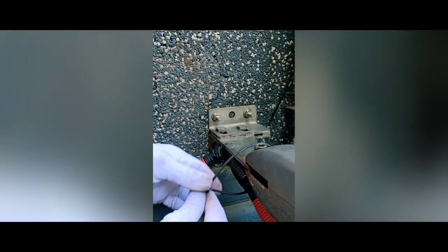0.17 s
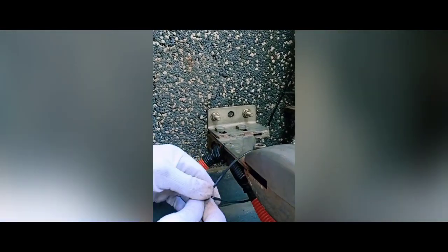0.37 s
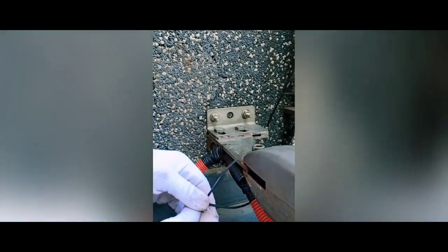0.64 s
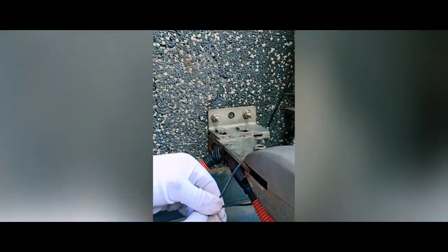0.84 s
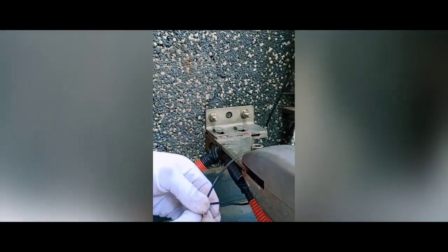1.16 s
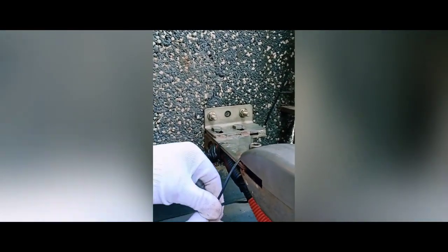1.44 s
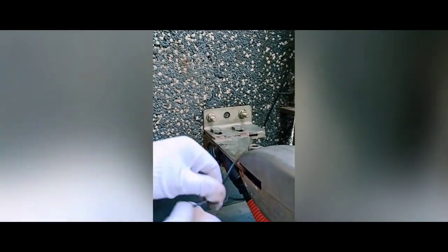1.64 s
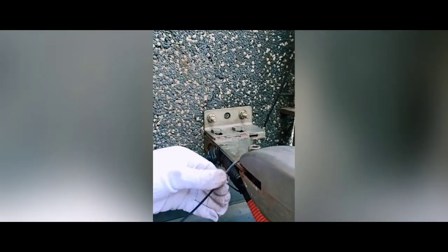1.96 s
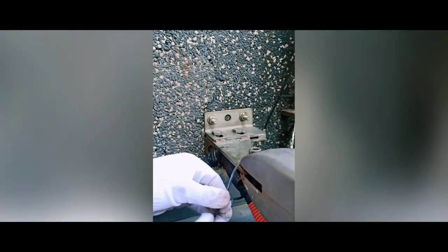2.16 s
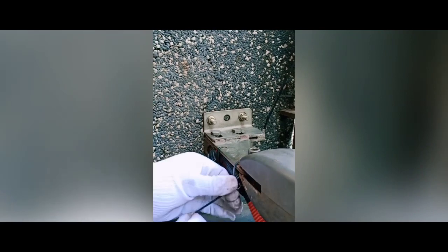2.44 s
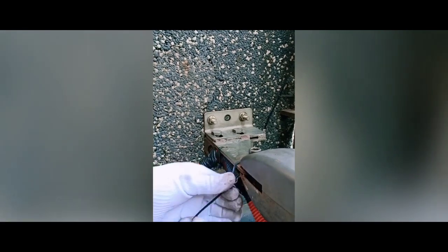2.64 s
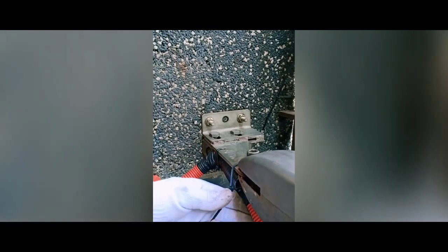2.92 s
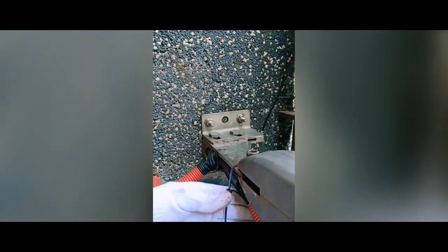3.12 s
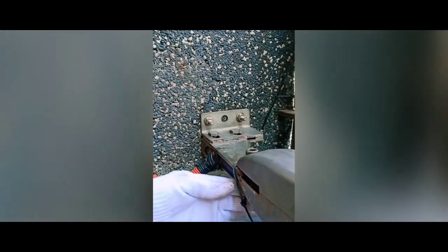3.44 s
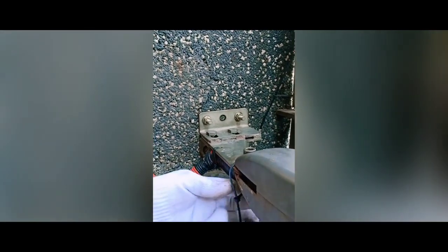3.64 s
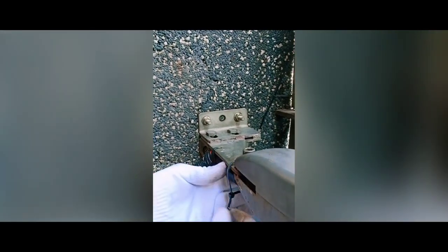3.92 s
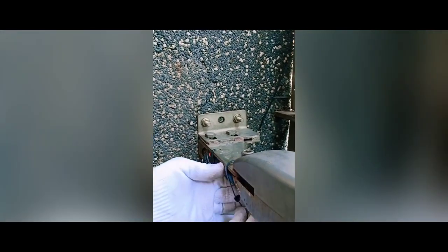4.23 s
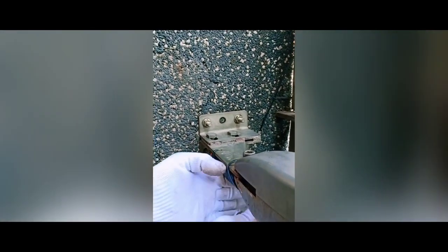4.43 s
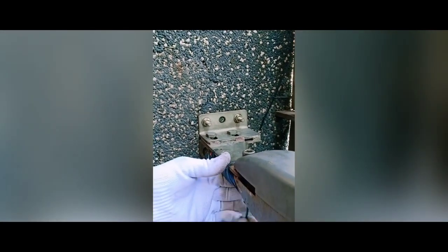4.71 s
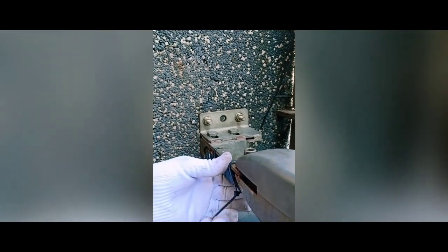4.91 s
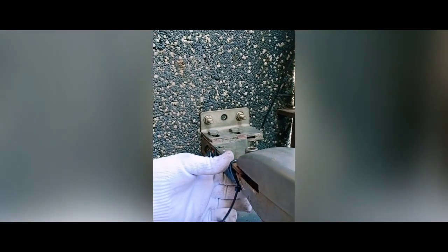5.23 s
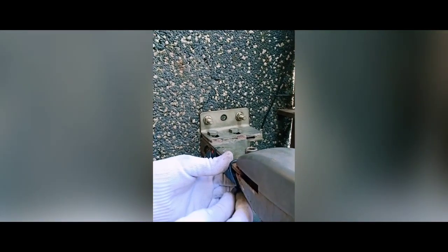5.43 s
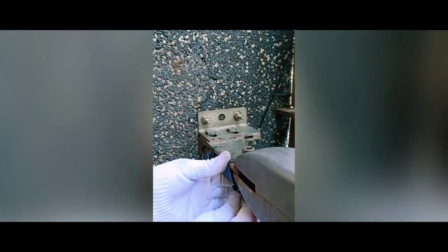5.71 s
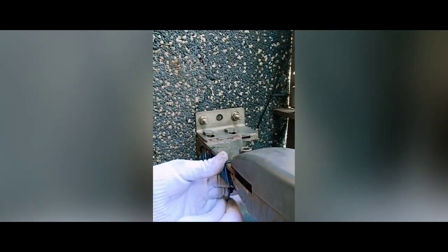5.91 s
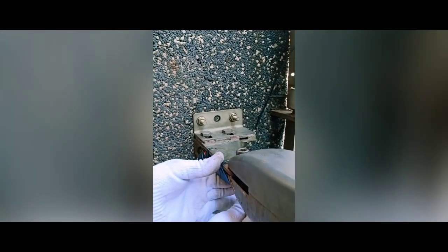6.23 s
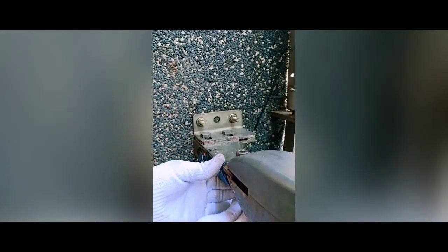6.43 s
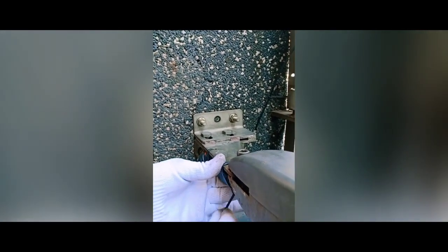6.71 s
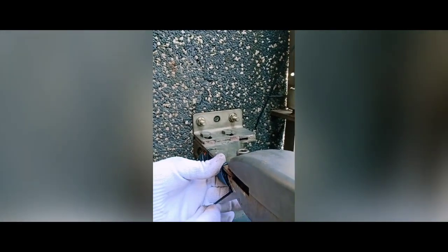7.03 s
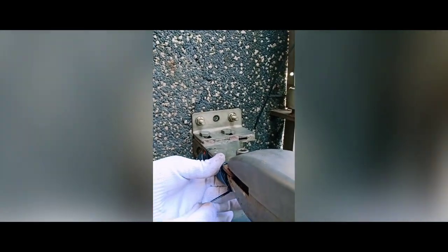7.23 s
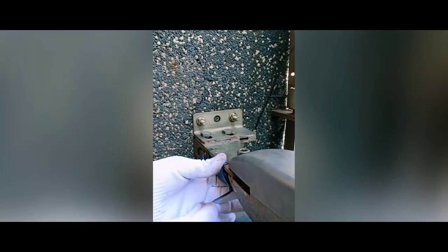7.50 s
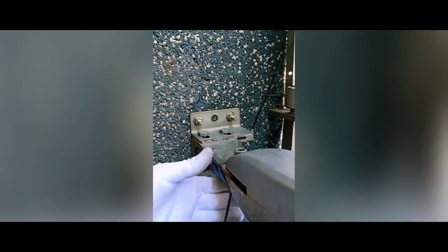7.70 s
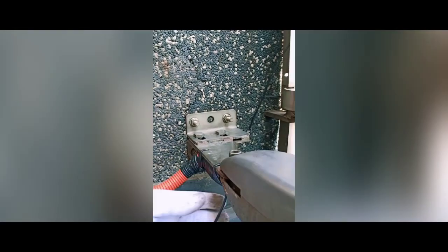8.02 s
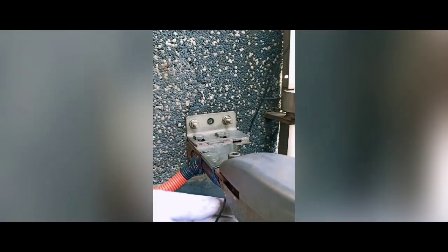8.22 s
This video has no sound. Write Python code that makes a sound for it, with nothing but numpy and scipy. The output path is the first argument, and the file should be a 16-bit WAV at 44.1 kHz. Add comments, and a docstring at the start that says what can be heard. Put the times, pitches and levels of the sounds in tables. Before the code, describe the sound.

A plastic cable tie clicks and ratchets in short zips as gloved hands pull it tight, over faint outdoor rumble.

```python
"""Tightening a cable tie

Gloved hands pull a plastic tie tight round a cable, outdoors, close to a stereo microphone.
Each tooth snaps past the pawl (the tie's little catch) and makes strap, cable and bracket ring.
Fast pulls blur the snaps into zips. The gloves rub and knock, and nearby walls echo faintly.
Behind it all are distant rumble, hiss and a low hum that comes and goes."""
import sys
import numpy as np
from scipy import signal
from scipy.fft import rfft, irfft
from scipy.io import wavfile
from scipy.ndimage import uniform_filter1d

SR = 44100
rng = np.random.default_rng(int(sys.argv[2]) if len(sys.argv) > 2 else 0)


def output_pcm(signal):
    """Save a mono or channel-first signal as 16-bit PCM at the path in sys.argv[1].

    Samples are clipped to [-1, 1] before scaling.
    """
    pcm = np.clip(np.atleast_2d(signal).T, -1, 1) * 32767
    wavfile.write(sys.argv[1], SR, np.round(pcm).astype(np.int16))


N = 368875
T = np.arange(N) / SR

# Single clicks, mostly teeth snapping, a few the louder ticks of the glove threads: (time [s], peak level [dB],
# cable ring above that peak [dB])
CLICKS = [(0.3566, -39, -16), (1.7518, -37, -35), (1.7648, -30.5, -20.5), (2.1835, -26.5, -16),
          (2.2044, -36.5, -20), (2.2953, -34.5, -26), (2.4259, -40, -7), (2.4663, -33.5, -11),
          (2.5046, -30, -5), (2.9704, -34, -8), (3.147, -29, -2.5), (3.1829, -31, 1.5),
          (3.2401, -20.5, -12.5), (3.2729, -22, -1.5), (3.2864, -29, 8), (3.3343, -17.5, -9.5),
          (3.3662, -23.5, -5), (3.3814, -24, -13), (3.403, -22.5, -19), (3.8072, -39, -10),
          (3.9075, -38, -18), (4.063, -35.5, -5), (4.0774, -38, 2), (4.0964, -35.5, 0), (4.116, -33, -17),
          (4.135, -33.5, 5), (4.1606, -31, 3), (4.1864, -26, 3.5), (4.2182, -37.5, -4), (4.2475, -27, 3),
          (4.2918, -20.5, -6.5), (4.3444, -24.5, -6.5), (4.6406, -31.5, -0.5), (4.6744, -24.5, 2),
          (4.7134, -16, 0.5), (4.8037, -24.5, -1), (4.8319, -19.5, -0.5), (4.8597, -14, -2.5),
          (4.882, -17, 1), (4.9256, -14, -6), (4.9729, -10.5, -6), (5.0711, -19, -1), (6.0461, -9.5, -13),
          (6.0637, -9.5, -27), (6.0831, -5.5, -21), (6.1025, -8.5, -28.5), (6.1074, -6.5, -19),
          (6.126, -3.5, -19), (6.1501, -3.5, -23), (6.1611, -9, -18), (6.1809, -5.5, -30),
          (6.2182, -13, -11), (6.4916, -11, -3.5), (6.5149, -14, -4.5), (6.5298, -12.5, -7.5),
          (6.5384, -17.5, -31), (6.548, -17.5, -6.5), (6.565, -14, -5.5), (6.6188, -17, -7),
          (6.6785, -15.5, -10.5), (7.7098, -34, -11), (7.7377, -29, -9), (7.893, -30.5, -25),
          (7.922, -25, -40), (7.9638, -27, -39.5), (7.9776, -26.5, -29), (8.0295, -22, -43),
          (8.094, -23, -34)]
# Fast pulls: (time [s], length [s], speed at start, middle and end [teeth/s], tooth peak level [dB],
# swell in the middle [dB], cable ring above the peak [dB])
FAST_PULLS = [(1.548, 0.199, 602, 520.5, 140, -27, -2, -24.5),
              (2.308, 0.1016, 110.9, 383.7, 196.2, -33, 3, -19),
              (4.724, .071, 258.8, 197, 107.2, -23.5, -6, 4.5), (8.059, .025, 250, 260, 240, -28, 7, -40),
              (8.1055, .125, 94.63, 94.6, 97.2, -35, 1, -30)]
# Each grip, held until the next: (time [s], left minus right [dB], bracket above strap [dB],
# crack above bracket [dB], strap focus [Hz], bracket focus [Hz], strap ring time in the glove [factor])
HAND_GRIPS = [(0, -1, 3, -1, 2700, 5300, 0.3), (1.585, 0, 1, 0, 2400, 3500, 0.35),
              (2.1, -0.5, 16.5, -10.5, 2400, 4540, 0.64), (2.25, -1.5, -2.5, 3, 2200, 4500, 0.5),
              (2.415, 1, -3.5, 1.5, 1590, 4400, 1.45), (2.8, -0.5, -14, -7, 1706, 4400, 1.5),
              (3.06, -1.22, -1, -13, 2350, 3990, 1.62), (3.8, -1.5, -9, -9, 2410, 4970, 1.165),
              (4.5, -1, 1, -6, 2500, 4900, 0.5), (4.818, -0.36, -4.5, -7.5, 1938, 4700, 0.604),
              (5.6, -1, -3, -11, 2420, 4500, 1.0), (6.095, -1, 3, -15, 2450, 5150, .6),
              (6.36, -1, -9, -9, 1903, 4850, 0.438), (7.2, 4.5, 5.5, -11, 2400, 4920, 0.71),
              (7.82, 7, -28.5, -15, 2120, 4500, 0.44), (7.91, 10.5, 12, -6, 2430, 4230, 2.5),
              (8.0, 7, 6, -16.5, 2399, 5740, 1.27), (8.055, 9, 16, -11, 1900, 4250, .6),
              (8.085, 11.5, 2, -24, 2950, 4450, 0.9)]
# Tones each part rings with: (pitch [Hz], base level [dB], base time to fade by 60 dB [s])
CABLE_TONES = [(373, 7, 0.0616), (691, -3, 0.039), (1018, 13, 0.0076)]
STRAP_TONES = [(1555, 17.6, 0.051), (1898, 15.5, 0.032), (2250, 4.5, 0.038), (2420, 15, 0.04),
               (2634, 11, 0.034), (2974, 5.64, 0.035)]
BRACKET_TONES = [(3250, 6.9, 0.016), (3770, 8.6, 0.017), (4295, 6.7, 0.017), (4760, 4.5, 0.014),
                 (5113, 6.1, 0.017), (5690, 4.5, 0.015)]
# Glove fabric sliding: (time [s], length [s], level [dB], band centre [Hz], band width [Hz])
GLOVE_RUBS = [(3.363, 0.077, -39, 610, 960), (5.752, 0.097, -45.5, 606, 925),
              (5.871, 0.11, -43.5, 427, 553), (7.45, 0.11, -54.5, 4700, 900),
              (3.756, 0.063, -64.5, 11000, 8000), (8.018, 0.083, -39.5, 2010, 1520)]
# The hand bumping the cable: (time [s], strength [dB], pitch [Hz], time to fade by 60 dB [s])
HAND_KNOCKS = [(5.914, -12, 155, 0.039)]
# Swells of hum: (time [s], length [s], first pitch [Hz], last pitch [Hz], level before fading [dB])
HUM_SWELLS = [(3.25, 0.6, 141, 139.8, -46), (3.3, 0.59, 186.2, 178.5, -48),
              (4.68, 0.37, 134.6, 138.7, -45.5), (7.15, 0.3, 128, 148, -45.5), (7.4, 0.54, 150.4, 141, -48),
              (7.8, 0.32, 138, 132.4, -49.5)]
# Tone colour of the background: (frequency [Hz], relative level [dB])
AIR_SPECTRUM = [(25, -15), (60, -9), (140, 3), (270, -6), (480, -5), (1300, -19.5), (2500, -13.5),
                (3500, -23), (5200, -20), (7500, -35.5), (16000, -43)]
# How the distant rumble swells: (time [s], relative level [dB])
RUMBLE_SWELL = [(0, -43.5), (4.0, -42), (6.5, -40), (7.2, -41.5)]

DROP_S, CREEP_S = .001, .0006  # the pawl creeps over a tooth, chattering ever louder, then drops
CHATTER_S, CHATTER_DB = .003, -19
SNAP_S, SNAP_DB, CRACK_S = .0022, -4, .005  # two noise bursts: a dry snap and a brighter crack
SPIKE_S, SPIKE_DB = .0001, -26  # the one sharp pulse of the drop, relative to the strap
FOCUS_DB, RING_DETUNE = 32, .012  # fall per octave away from the focus; pitch scatter per blow
HUM_FADE_S, HUM_FALL_DB, HUM_WAVER_DB, HUM_WANDER = .082, 5.5, 3, .025
RUSTLE_PER_S, RUSTLE_DB = 4.3, -64  # faint ticks of the glove threads
AIR_DB, TOP_HZ = -49, 15550


def ratchet():
    """The pawl drops off each tooth and chatters, ringing strap, bracket and cable."""
    time_s, peak_db, cable_db = np.vstack([CLICKS] + [zip_teeth(pull) for pull in FAST_PULLS]).T
    _, bracket_db, crack_db, strap_hz, bracket_hz, ring_scale = grip(time_s)
    count, t = len(time_s), np.arange(2048) / SR
    after = np.clip(t - DROP_S, 0, None)
    creep = np.clip(DROP_S - t, 0, None) / CREEP_S
    scatter_db = 2 * rng.standard_normal(count)  # the bracket is never hit equally hard
    push = undb(CHATTER_DB) * rng.standard_normal((count, 400))
    push *= np.exp(-after[:400] / CHATTER_S - creep[:400])
    push[:, int(DROP_S * SR)] = 1  # the drop itself
    noise = rng.standard_normal((count, 3, len(t)))
    noise += 1.8 * rng.standard_normal((3, len(t)))  # a part that every tooth repeats
    noise = (noise[:, :2] + .35 * noise[:, 2:]).transpose(1, 0, 2)  # a part both sides share
    cable = ring(CABLE_TONES, push, t, np.full(count, 680), pan_db=4.3, lead_rad=.74)
    strap = ring(STRAP_TONES, push, t, strap_hz, pan_db=-2.8, lead_rad=-1.71, ring_scale=ring_scale)
    bracket = ring(BRACKET_TONES, push, t, bracket_hz, pan_db=3.2, lead_rad=1.35)
    snap = band(noise, 834, 4420) * np.exp(-after / SNAP_S - creep)
    crack = band(noise, 2540, 18300) * np.exp(-after / CRACK_S - creep) * undb([[[2.5]], [[-2.5]]])
    spike = np.exp(-((t - DROP_S) / SPIKE_S) ** 2) * np.ones((2, count, 1))
    parts = [(strap, 0), (bracket, bracket_db + scatter_db), (snap, bracket_db / 2 + SNAP_DB),
             (crack, bracket_db + crack_db), (spike, SPIKE_DB)]
    teeth = sum(y * (undb(db) / np.abs(y).max(axis=(0, 2)))[..., None] for y, db in parts)
    peak = lambda y: np.abs(y.mean(axis=0)).max(axis=1)
    teeth = teeth / peak(teeth)[:, None] + cable * (undb(cable_db) / peak(cable))[:, None]
    teeth *= (undb(peak_db) * pan(time_s))[..., None]
    out = np.zeros((2, N + len(t)))
    for k, at in enumerate((time_s * SR).astype(int)):
        out[:, at:at + len(t)] += teeth[:, k]
    # the teeth give no sound below about 320 Hz
    return signal.sosfilt(signal.butter(4, 320, "high", fs=SR, output="sos"), out[:, :N])


def zip_teeth(pull, uneven=.06, scatter_db=.89):
    """A fast pull clicks each time the strap moves on by one tooth; gives rows like CLICKS."""
    start_s, length, first, middle, last, db, swell_db, cable_db = pull
    progress = np.arange(0, 1, 1 / (length * SR))
    moved = np.cumsum(np.interp(progress, [0, .5, 1], [first, middle, last])) / SR
    chance = rng.standard_normal((400, 2))
    places = np.cumsum(np.r_[0, 1 + uneven * np.clip(chance[1:, 0], -2, 2)])
    at = np.interp(places[places < moved[-1]], moved, progress)
    peak_db = db + swell_db * np.sin(np.pi * at) + scatter_db * chance[:len(at), 1]
    return np.array([start_s + length * at, peak_db, np.full(len(at), cable_db)]).T


def ring(tones, push, t, focus_hz, pan_db, lead_rad, ring_scale=1):
    """Each push rings a part's fading tones, favouring those near focus_hz; gives (side, tooth, time)."""
    hz, db, fade_s = np.transpose(tones)[:, None, :, None]
    chance = rng.standard_normal((len(focus_hz), len(tones), 2))
    octaves_off = np.abs(np.log2(hz / focus_hz[:, None, None]))
    size = undb(db - FOCUS_DB * octaves_off + 1.5 * chance[..., :1])
    size = size * decay(t, fade_s * np.reshape(ring_scale, (-1, 1, 1)))
    pitch = hz * (1 + RING_DETUNE * chance[..., 1:])
    swing = (size * np.exp(2j * np.pi * pitch * t)).sum(axis=1)
    # each part lies elsewhere, so it reaches one side louder and earlier
    sides = np.array([undb(k * pan_db / 2) * (swing * np.exp(k * .5j * lead_rad)).imag for k in (1, -1)])
    return signal.fftconvolve(sides, push[None], axes=2)[..., :len(t)]


def grip(time_s):
    """The settings of the grip held at the given times."""
    table = np.array(HAND_GRIPS)
    row = np.searchsorted(table[:, 0], time_s, side="right") - 1
    return table[np.maximum(row, 0), 1:].T


def pan(time_s):
    """Left and right gains for where the hands are."""
    db = grip(time_s)[0]
    return undb(np.array([db, -db]) / 2)


def gloves():
    """Knitted fabric slides in grainy strokes, its threads tick, and the hand knocks the cable."""
    out = np.zeros((2, N))
    for start_s, length, db, hz, width_hz in GLOVE_RUBS:
        at, n = int(start_s * SR), int(length * SR)
        grains = rng.standard_normal((2, 8000))
        grains *= undb(12 * uniform_filter1d(rng.standard_normal(8000), size=100))
        stroke = band(grains + .38 * grains[::-1], hz - width_hz / 2, hz + width_hz / 2)[:, :n]
        out[:, at:at + n] += undb(db) * stroke * signal.windows.tukey(n, .5) * pan(start_s)[:, None]
    ticks = (rng.random(N) < RUSTLE_PER_S / SR) * undb(6.7 * rng.standard_normal(N))
    ticks = signal.lfilter([1], [1, -np.exp(-1 / (.0069 * SR))], ticks)  # each tick dies away
    out += undb(RUSTLE_DB) * ticks * band(rng.standard_normal((2, N)), 4000, 13000)
    for start_s, db, hz, fade_s in HAND_KNOCKS:
        t = np.clip(T - start_s, 0, None)
        soft_start = 1 - np.exp(-t / .0076)
        out += undb(db) * np.sin(2 * np.pi * hz * t) * decay(t, fade_s) * soft_start
    return out


def echo(near):
    """Nearby walls send back a short blur of sound, and a hollow housing booms a little longer."""
    t = np.arange(int(.6 * SR)) / SR
    walls, housing = (700, 12500, .27, -41.5, .014), (360, 498, 1, -55.5, .33)
    tail = 0
    for lo_hz, hi_hz, fade_s, db, alike in (walls, housing):
        noise = rng.standard_normal((2, len(t)))
        noise = band(noise + alike * noise[::-1], lo_hz, hi_hz)
        tail = tail + undb(db) * noise * decay(t, fade_s) * (t > .004)
    return signal.fftconvolve(near.mean(axis=0)[None], tail, axes=1)[:, :N]


def hum():
    """A low tone swells and wavers, the same left and right."""
    out = 0
    for start_s, length, first_hz, last_hz, db in HUM_SWELLS:
        progress = np.clip((T - start_s) / length, 0, 1)
        fade = np.clip(np.minimum(progress, 1 - progress) * length / HUM_FADE_S, 0, 1)
        hz = (first_hz + (last_hz - first_hz) * progress) * (1 + HUM_WANDER * wander(12))
        level = undb(db - HUM_FALL_DB * progress + HUM_WAVER_DB * wander(18))
        out = out + fade * level * np.sqrt(2) * np.sin(2 * np.pi * np.cumsum(hz) / SR)
    return out


def air():
    """Far rumble swells under a smooth hiss; left and right share the bass but not the treble."""
    hz = np.maximum(np.arange(N // 2 + 1) * SR / N, 1)
    point_hz, point_db = np.transpose(AIR_SPECTRUM)
    colour = undb(np.interp(np.log(hz), np.log(point_hz), point_db))
    alike = .96 / (1 + (hz / 650) ** 4.27)
    mid, side = rfft(rng.standard_normal((2, N))) * colour * np.sqrt([1 + alike, 1 - alike])
    both = np.array([mid + side, mid - side]) * undb(AIR_DB) / np.std(irfft(mid, N))
    bass = 1 / (1 + (hz / 800) ** 4)
    time_s, db = np.transpose(RUMBLE_SWELL)
    rumble = irfft(both * bass, N) * undb(np.interp(T, time_s, db - db.min()))
    hiss = irfft(both * (1 - bass), N) * undb(.22 * wander(4.9))
    return rumble + hiss


def undb(db):
    """Turn decibels into a gain."""
    return 10 ** (np.asarray(db) / 20)


def decay(t, fade_s):
    """A fade that falls 60 dB in fade_s seconds."""
    return np.exp(-np.log(1000) * t / fade_s)


def band(x, lo_hz, hi_hz):
    """Keep one band of frequencies, scaled to an average power of 1."""
    edges = [max(lo_hz, 30), min(hi_hz, 18000)]
    y = signal.sosfilt(signal.butter(2, edges, "band", fs=SR, output="sos"), x)
    return y / np.sqrt(np.mean(y ** 2))


def wander(per_s):
    """A smooth random drift, about 1 in size, with per_s new targets a second."""
    hold = int(SR / per_s)
    steps = np.repeat(rng.standard_normal(N // hold + 1), hold)
    y = uniform_filter1d(uniform_filter1d(steps, hold), hold)[:N]
    return y / y.std()


def scene():
    """Tie and hands, their echo, and the background."""
    near = ratchet() + gloves()
    return near + echo(near) + hum() + air()


def record(dry):
    """Round off the loudest peaks and cut the highest treble."""
    return signal.sosfilt(signal.ellip(8, .2, 70, TOP_HZ, fs=SR, output="sos"), np.tanh(dry))


dry = scene()
out = record(dry)
output_pcm(out)
```